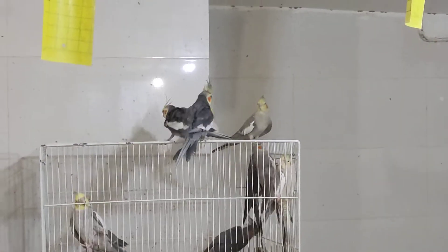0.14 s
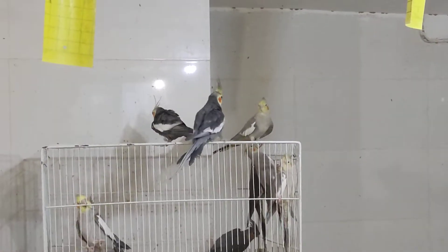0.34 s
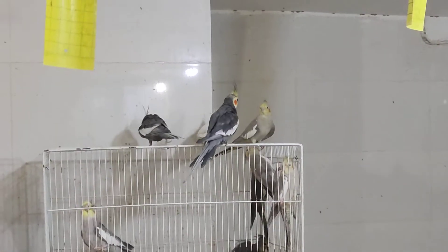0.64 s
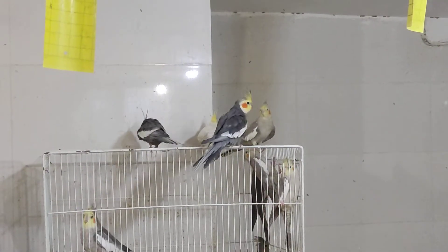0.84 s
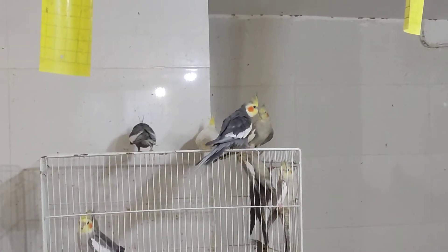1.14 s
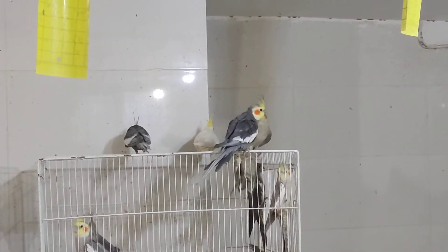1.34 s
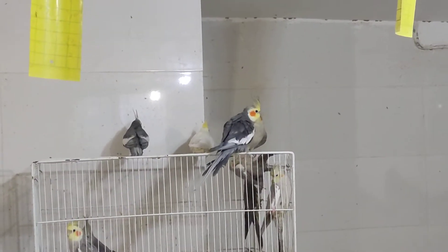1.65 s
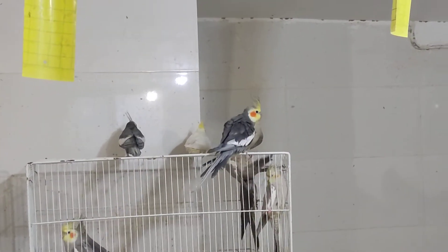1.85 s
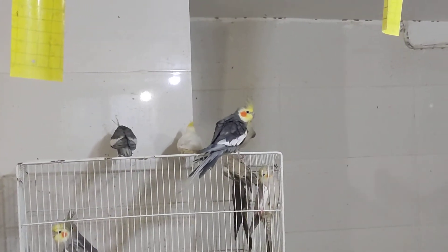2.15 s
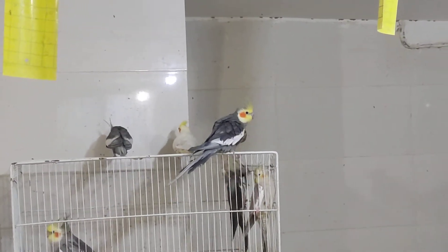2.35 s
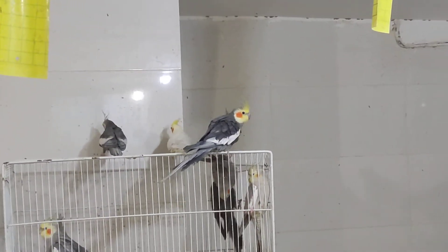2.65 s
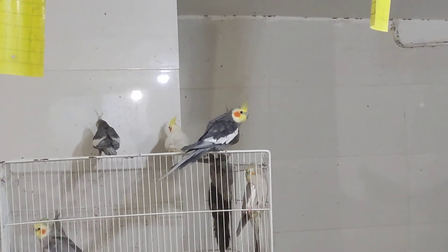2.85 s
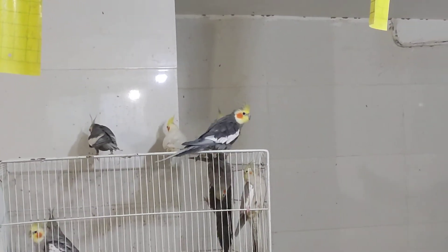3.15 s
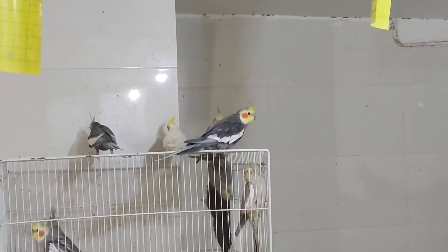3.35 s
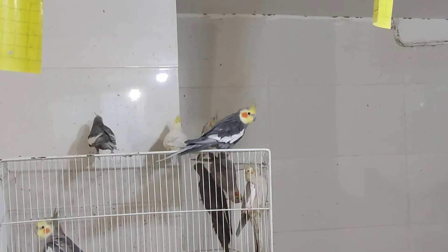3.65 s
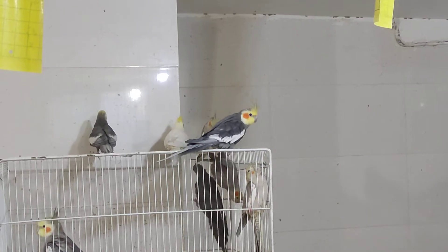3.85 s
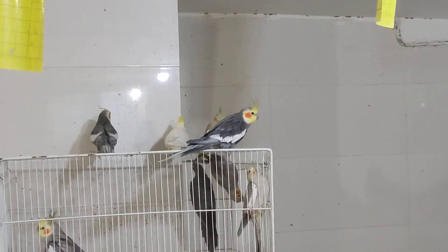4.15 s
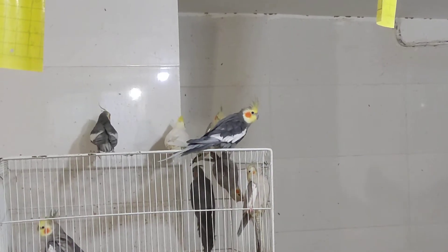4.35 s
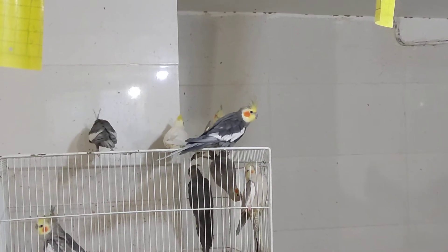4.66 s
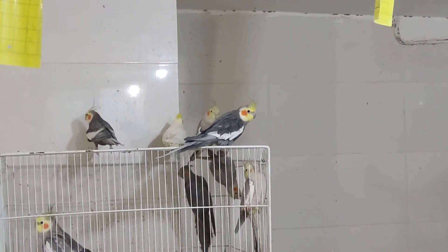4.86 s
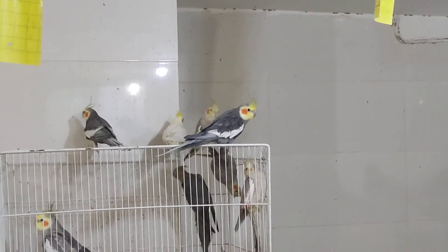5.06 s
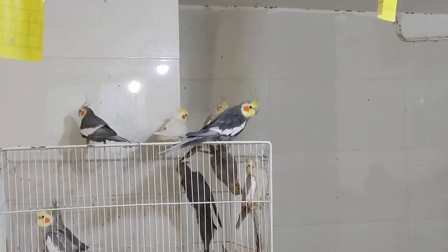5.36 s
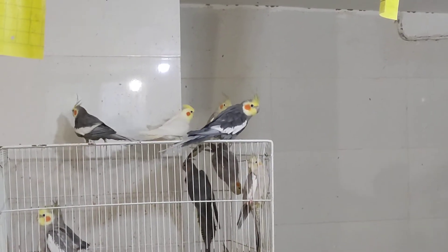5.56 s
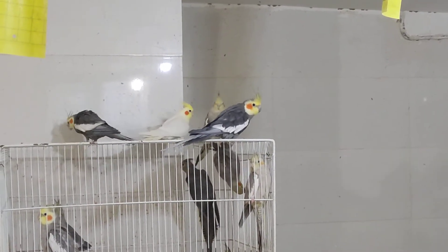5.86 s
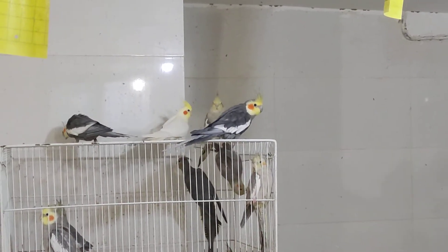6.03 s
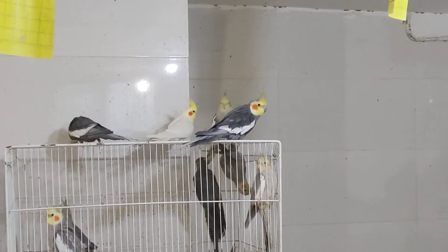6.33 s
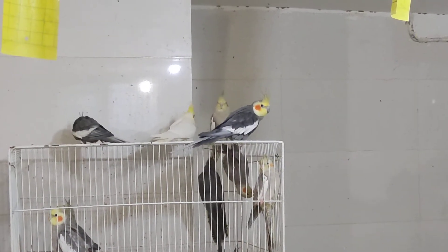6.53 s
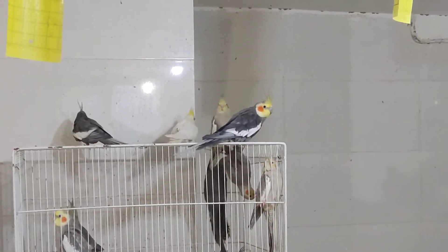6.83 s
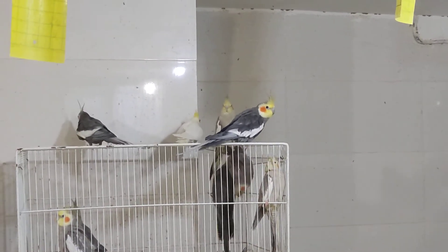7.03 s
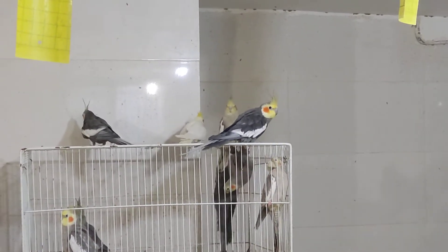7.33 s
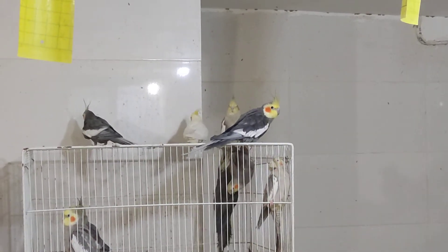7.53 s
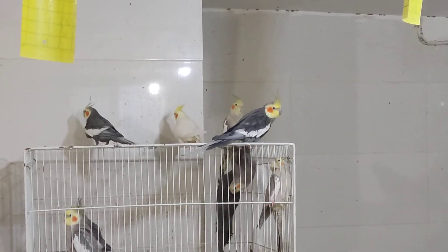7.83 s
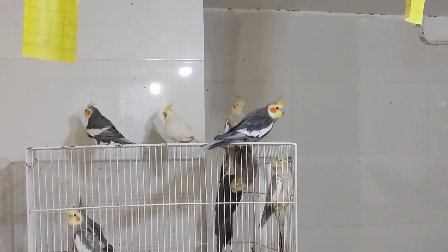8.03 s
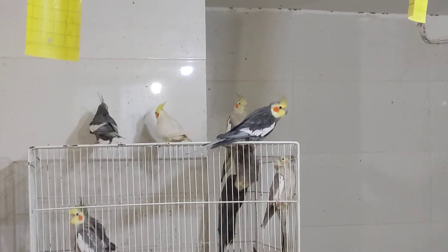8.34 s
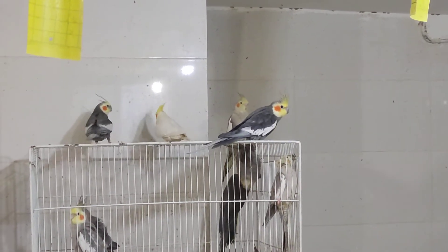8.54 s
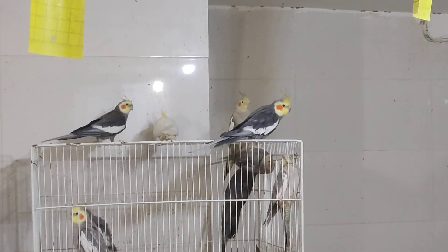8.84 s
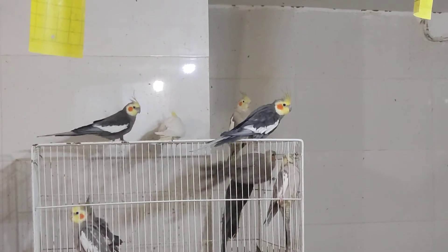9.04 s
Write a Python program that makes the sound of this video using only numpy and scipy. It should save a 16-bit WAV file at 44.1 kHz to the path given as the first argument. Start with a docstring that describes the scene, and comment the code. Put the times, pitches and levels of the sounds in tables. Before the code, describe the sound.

A fan hums softly with moving air in a hard, tiled room. After some faint preening and one sharp click on cage wire, cockatiels give a few shrill, scratchy squawks, pause, then call in two busier runs separated by a quick brushing of feathers. Each call leaps up in pitch and slides down roughly. The microphone picks up the birds with a short, bright echo.

```python
"""Cockatiels squawk on a wire cage in a hard, tiled room. Each call glides up from a buzzy start,
leaps into a shrill whistle, sags, and breaks into rasp where the two sides of the syrinx fall out
of step. Feathers flick and rustle between the calls, and a claw or beak clicks once on the wire.
The birds ring off the tiles, and a fan's motor hum and moving air lie underneath throughout."""
import sys
import numpy as np
from scipy import signal
from scipy.fft import rfft, irfft, next_fast_len
from scipy.io import wavfile
from scipy.ndimage import map_coordinates

SR = 44100
rng = np.random.default_rng(int(sys.argv[2]) if len(sys.argv) > 2 else 0)


def generate_wav(sig):
    """Save sig (samples, or channels by samples) to the path in sys.argv[1] as 16-bit PCM at SR."""
    pcm = np.round(np.clip(np.atleast_2d(sig).T, -1, 1) * 32767).astype(np.int16)
    wavfile.write(sys.argv[1], SR, pcm)


N = 405279
TIME = np.arange(N) / SR


def undb(db):
    """Decibels to gain."""
    return 10 ** (np.asarray(db) / 20)


def along(points, hz):
    """Read (Hz, value) points on a log-frequency axis."""
    f, value = np.transpose(points)
    return np.interp(np.log(np.maximum(hz, 1)), np.log(f), value)


def unit(x):
    """Scale to rms 1."""
    return x / np.sqrt(np.mean(x ** 2))


def colour(x, points):
    """Apply an EQ curve of (Hz, dB) points."""
    size = next_fast_len(N + 4096)
    return irfft(rfft(x, size) * undb(along(points, np.fft.rfftfreq(size, 1 / SR))), size)[..., :N]


def wander(size, hz):
    """Smooth random modulation of rms 1 that changes hz times a second."""
    at = np.arange(size) * hz / SR
    return unit(map_coordinates(rng.standard_normal(int(at[-1]) + 4), [at + 1], order=2))


def turn(hz):
    """Running phase of a moving frequency."""
    return 2 * np.pi * np.cumsum(hz) / SR


# The fan motor's tones. Each row: pitch in Hz, level in dB before the ride.
MOTOR_TONES = [(70.8, -51), (141.5, -43.5), (145.5, -48), (220.7, -55.5), (414.5, -58)]
# A slow level ride that eases the hum down and partly back. Each row: time in seconds, gain in dB.
MOTOR_RIDE = [(0, 3.5), (4.4, 1.5), (5.8, -1.5), (9.19, 1)]
# The colour of the moving air. Each row: frequency in Hz, relative level in dB.
AIR_EQ = [(25, -13.5), (45, -15.5), (72, -23), (100, -6.5), (190, -8.5), (400, -12), (560, -17.5),
          (660, -14.5), (800, -19), (1400, -23), (2420, -21), (3400, -27.5), (5240, -32.5), (8690, -28.5),
          (11300, -33), (14400, -53)]
# How centred the air sounds. Each row: frequency in Hz, left-right correlation (1 is mono, 0 is wide).
AIR_CORRELATION = [(30, 0.4), (65, 0.83), (150, 0.92), (280, .75), (520, 0.63), (1000, -.1), (3000, 0)]


def fan(drift_hz=0.704, throb_db=-1.2, air_db=-38):
    """A wavering motor hum over moving air, centred in the bass and wide in the treble."""
    hum = np.zeros(N)
    for hz, db in MOTOR_TONES:
        level = np.sqrt(2) * undb(db + throb_db * wander(N, 1.8))
        hum += level * np.sin(turn(hz + drift_hz * wander(N, 6)))
    hum *= undb(np.interp(TIME, *np.transpose(MOTOR_RIDE)))
    alike = along(AIR_CORRELATION, np.fft.rfftfreq(N, 1 / SR))
    mid, side = rfft(rng.standard_normal((2, N))) * np.sqrt([1 + alike, 1 - alike])
    air = colour(irfft(np.array([mid + side, mid - side]), N), AIR_EQ)
    return hum + undb(air_db) * unit(air)


# Bouts of preening. Each row: centre in seconds, half length in seconds, level in dB.
RUSTLE_BOUTS = [(0.19, 0.41, -41.5), (0.315, 0.021, -51), (0.656, 0.042, -37.5), (0.772, .12, -52),
                (1.723, 1, -49), (4.396, .03, -49), (4.77, 0.34, -60), (6.49, 0.072, -40.5)]
# The airy colour of plumage. Each row: frequency in Hz, relative level in dB.
RUSTLE_EQ = [(1200, -19), (4700, -11), (6800, -14), (8700, 2), (10500, -4), (14000, -11)]


def plumage_rustle(uneven_db=0.5, grain_db=4):
    """Birds preen and shuffle: a faint, uneven crackle of barbs that swells and fades in bouts."""
    barbs = rng.standard_normal(N) * undb(grain_db * wander(N, 400) + uneven_db * wander(N, 8.3))
    swell = sum(undb(db) * np.exp(-((TIME - centre) / half) ** 2) for centre, half, db in RUSTLE_BOUTS)
    return swell * unit(colour(barbs, RUSTLE_EQ))


# Feather flicks and scuffs, plus one sharp click of a claw or beak on the cage wire (the second row).
# Each row: start in seconds, level in dB, decay time constant in seconds.
FLICKS_AND_CLICK = [(.207, -28.5, 0.011), (0.302, -16.5, 0.0016), (1.37, -39, 0.011), (1.52, -41, 0.011),
                    (4.514, -27.5, 0.035), (4.66, -39, 0.044), (5.726, -35.5, 0.012), (6.365, -39, .015),
                    (7.175, -32.5, 0.023), (7.307, -11.5, 0.015), (7.445, -18.5, 0.015),
                    (7.51, -29.5, 0.047)]
# The bright colour of the flicks and the click. Each row: frequency in Hz, relative level in dB.
BURST_EQ = [(530, -52), (900, -21), (1070, -11), (1180, -14), (2500, -8.5), (2840, -11), (3540, -5),
            (5630, -12), (8850, 3), (14400, -5)]


def flicks_and_click(grain_db=3, attack_share=0.22):
    """Feathers brush, and a claw or beak clicks once on the wire: short, grainy bursts of bright noise."""
    envelope = np.zeros(N)
    for start, db, decay in FLICKS_AND_CLICK:
        age = np.maximum(TIME - start, 0)
        envelope += undb(db) * np.minimum(age / (attack_share * decay), 1) * np.exp(-age / decay)
    grains = rng.standard_normal(N) * undb(grain_db * wander(N, 700))
    return envelope * unit(colour(grains, BURST_EQ))


LEAP_S = .022  # the voice flips from the glide up to the whistle


def syrinx_gesture(t, glide, hold, fall, start_hz, top_hz, end_hz, sag_hz, glide_db, top_db,
                   slack_second_db, start_upper_db, top_upper_db, glide_rasp, top_rasp):
    """A call's control curves: a buzzy glide, a sudden leap, an arched hold that cracks, a rough fall."""
    # breakpoints: onset, mid-glide, before the leap, after the leap, top, end of the hold, end
    stages = np.cumsum([0, glide / 2, glide / 2, LEAP_S, .45 * hold, .55 * hold, fall])
    hold_in_hz, hold_out_hz = .95 * top_hz + sag_hz, .95 * top_hz - sag_hz
    rise_hz = .52 * (hold_in_hz - start_hz)  # the glide climbs about halfway; the leap does the rest
    hz = np.interp(t, stages, [start_hz, start_hz + rise_hz / 2, start_hz + rise_hz,
                               hold_in_hz, top_hz, hold_out_hz, end_hz])
    db = np.interp(t, stages, [glide_db - 7, glide_db, glide_db + 3,
                               top_db - 1, top_db, top_db - 5, top_db - 16.5])
    rasp = np.interp(t, stages, [.062, glide_rasp, glide_rasp + .14,
                                 (glide_rasp + top_rasp) / 2, top_rasp, .19, .38])
    # the second harmonic moves from its slack level to a fixed low one as the membrane tightens
    slack_hz, pure_hz, taut_second_db = 1770, 2970, -17
    second_db = np.interp(hz, [slack_hz, pure_hz], [slack_second_db, taut_second_db])
    second_db += np.interp(t, stages, [3, 0, 0, 0, 0, 0, 5])  # extra as the voice catches and lets go
    # the opening buzz follows the climb only, so it does not return in the fall
    upper_db = np.interp(np.maximum.accumulate(hz), [start_hz, top_hz], [start_upper_db, top_upper_db])
    # a tight membrane cracks just before the hold ends, adding buzz and rasp
    crack_at, crack_half_s = stages[-2] - .0093, .016
    crack = np.exp(-((t - crack_at) / crack_half_s) ** 2) * np.interp(hz, [slack_hz, pure_hz], [0, 1])
    return hz, db, second_db, upper_db + 5 * crack, np.clip(rasp + .26 * crack, 0, 1)


def membrane_tone(hz, second_db, upper_db, slope_db=-2.0):
    """A membrane's tone on a moving pitch: fundamental, second harmonic and a falling run of others."""
    phase = turn(hz)
    tone = np.sin(phase) + undb(second_db) * np.sin(2 * phase)
    for k in range(3, 10):
        alias_guard = np.clip((SR / 2 - k * hz) / 5000, 0, 1)
        tone += undb(upper_db + slope_db * (k - 2.5)) * np.sin(k * phase) * alias_guard
    return tone


def squawk(row, taut_hz=2700, slack_hz=1700, flutter_hz=330, shimmer_db=5.5,
           growl_db=-1, hiss_db=-31, edge_s=0.0084):
    """One call: a membrane tone that clears as it tightens; a second, unsteady membrane adds the rasp."""
    start, glide, hold, fall, *voice = row
    span = (TIME > start - .004) & (TIME < start + glide + LEAP_S + hold + fall + .004)
    t = TIME[span] - start
    n = len(t)
    hz, db, second_db, upper_db, rasp = syrinx_gesture(t, glide, hold, fall, *voice)
    loose = np.clip((taut_hz - hz) / (taut_hz - slack_hz), 0, 1)
    # the airflow flutters and shakes a loose membrane's pitch
    flutter = np.sin(turn(flutter_hz * (1 + 0.252 * wander(n, 200))))
    shake = loose * .21 * np.minimum(rasp, .4) * flutter
    # the pitch keeps slipping down from its ceiling and snapping back
    slip_depth = .02 * loose + .06 * np.minimum(rasp, .5)
    slips = slip_depth * (.8 - np.minimum(wander(n, 520) ** 2, 4))
    waver = .00684 * wander(n, 128.8)
    tone = membrane_tone(hz * (1 + waver + shake + slips), second_db, upper_db)
    tone *= undb(shimmer_db * np.maximum(loose, rasp) * wander(n, 345.6))
    # the other side of the syrinx swings about below that pitch, brighter and chopped by the flutter
    growl_hz = hz * (.78 + .1437 * np.tanh(wander(n, 700)))
    growl = membrane_tone(growl_hz, np.maximum(second_db, -14), upper_db + 4) * (1 + flutter)
    roughness = undb(growl_db) * growl + undb(hiss_db) * rng.standard_normal(n)
    edges = signal.windows.tukey(n, min(1, 2 * edge_s * SR / n))
    call = np.zeros(N)
    call[span] = np.sqrt(2) * undb(db) * (tone + rasp * roughness) * edges
    return call


# The cockatiels' calls. Each row: start, glide, hold and fall in seconds; start, top and end pitch
# in Hz; sag in Hz (half the drop across the hold); glide and top level in dB before the throat EQ;
# slack second harmonic, upper harmonics at the start and at the top, in dB against the fundamental;
# rasp in the glide and at the top, from 0 to 1.
CALLS = [ (2.005, 0.13, 0.12, 0.056, 1621, 2398, 2140, -3, -33.5, -23, 2, -1, -18.5, 0.17, 0.1),
         (2.756, 0.052, 0.02, 0.013, 1602, 2726, 2300, 2, -28.5, -25.5, -8.5, 0, -24.5, 0.17, 0.76),
         (2.865, 0.024, .045, 0.019, 1811, 3040, 2510, -61, -26, -22, -13, -8.5, -26.5, 0.17, 0.4),
         (3.438, .042, 0.098, 0.038, 1777, 3302, 2230, -70.5, -24.5, -12, 6.5, -1.5, -27.5, 0.44, 0),
         (5.002, .088, 0.23, 0.031, 1814, 3020, 2570, 52, -23.5, -13.5, -9, -6, -23.5, .3, 0.42),
         (5.325, 0.026, 0.12, 0.041, 1950, 3228, 2530, -68.5, -23, -13.5, 8, -2, -31.5, 0.45, 0.21),
         (5.930, 0.04, .01, 0.024, 1407, 1840, 1510, -8, -35, -25, -2.5, -5.5, -14, 0.2, 0.57),
         (6.037, 0.09, .02, 0.027, 1525, 2084, 1990, 2, -27, -25.5, -8.5, -20, -11, 0.12, 0.5),
         (6.157, 0.0046, .08, .02, 2905, 3047, 2910, 28.5, -22, -21, -30, -32, -26.5, 0.34, 0.01),
         (6.528, 0.098, .1, 0.031, 1884, 3364, 2260, 34, -23, -18.5, -13, -9.5, -27, 0.51, 0.43),
         (7.681, .078, 0.089, 0.084, 1476, 2392, 1740, 1.5, -32, -28, -15.5, -9.5, -25.5, 0.15, 0.82),
         (7.973, .07, 0.034, 0.029, 1500, 2317, 2060, 6, -28.5, -26, -14.5, -6.5, -19, 0.2, 0.64),
         (8.155, .03, .09, .06, 1798, 3414, 2547, 142.5, -23.5, -11.5, 12, 9, -36, 0.51, 0.04),
         (8.503, 0.073, 0.071, 0.057, 1942, 3286, 1990, -31, -23, -16, -5.5, -12, -19, 0.2, 0.18),
         (8.848, .038, .15, 0.069, 1640, 2997, 1698, 50.5, -21.5, -13.5, -14, -3.5, -24.5, .1, 0.26), ]
# The resonances of throat and open beak. Each row: frequency in Hz, gain in dB.
THROAT_EQ = [(700, -41), (1200, -10.5), (1550, -9), (2200, -1), (3300, 0.5), (4100, 4.5), (5300, -3),
             (6200, -1), (7300, -0.5), (8800, 6), (11000, -3), (14000, -8.5)]


def cockatiels():
    """Every squawk leaves the syrinx through the throat and open beak, which colour it."""
    return colour(sum(squawk(row) for row in CALLS), THROAT_EQ)


# The ring of the tiled room. Each row: frequency in Hz, time to fall 60 dB in seconds.
ROOM_DECAY = [(1000, 0.53), (2800, 0.52), (5000, 0.48), (9000, 0.36), (14000, 0.089)]


def tiled_room(x, direct_db=-5, slap_db=-12.5, tail_db=-4.0, build_s=0.014, left_lag_samples=20):
    """Direct sound reaching the right side first, slaps off the nearest tiles, then a dense tail."""
    size = int(.8 * SR)
    t, f = TIME[:size], np.fft.rfftfreq(size, 1 / SR)
    noise = rfft(rng.standard_normal((2, size)))
    centres, decays = np.transpose(ROOM_DECAY)
    tail = np.zeros((2, size))
    for weights, t60 in zip(np.eye(len(centres)), decays):
        band = irfft(noise * np.interp(f, centres, weights), size)
        tail += band * undb(-60 * t / t60)
    response = unit(tail * np.minimum(t / build_s, 1)) * undb(tail_db) / np.sqrt(size)
    response[[0, 1], [left_lag_samples, 0]] += undb(direct_db)
    for ear in response:
        slaps_s = rng.uniform(.0015, .018, size=8)
        ear[(slaps_s * SR).astype(int)] += undb(slap_db)
    return signal.fftconvolve(x[None], response, axes=1)[:, :N]


def scene():
    """Calls, feather sounds and the click on the wire ring in the room over the fan."""
    return tiled_room(cockatiels() + flicks_and_click() + plumage_rustle()) + fan()


# The tonal balance of the two microphone ports. Each row: frequency in Hz, left minus right in dB.
PORT_BALANCE = [(600, 0.5), (2300, -2), (4200, 1.5), (7700, -7), (9500, -6), (12000, 9.5), (14000, 0.5)]


def record(dry, ceiling=.9, top_hz=14500):
    """Each microphone port colours the treble its own way; peaks are rounded and the top is cut."""
    left = colour(dry[0], [(hz, db / 2) for hz, db in PORT_BALANCE])
    right = colour(dry[1], [(hz, -db / 2) for hz, db in PORT_BALANCE])
    ports = np.array([left, right])
    rounded = ports / (1 + (ports / ceiling) ** 8) ** (1 / 8)
    high_cut = signal.ellip(8, .1, 60, top_hz, fs=SR, output="sos")
    return signal.sosfiltfilt(high_cut, rounded)


dry = scene()
out = record(dry)
generate_wav(out)
```